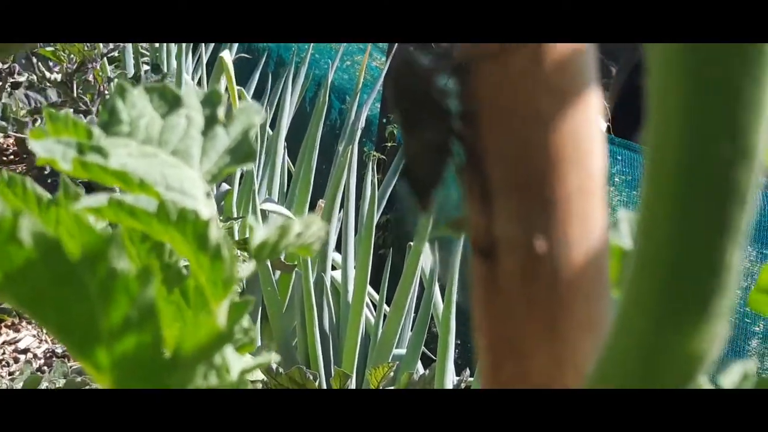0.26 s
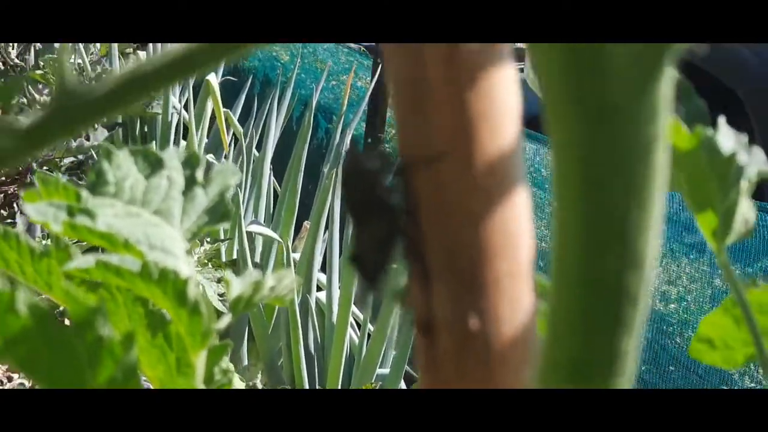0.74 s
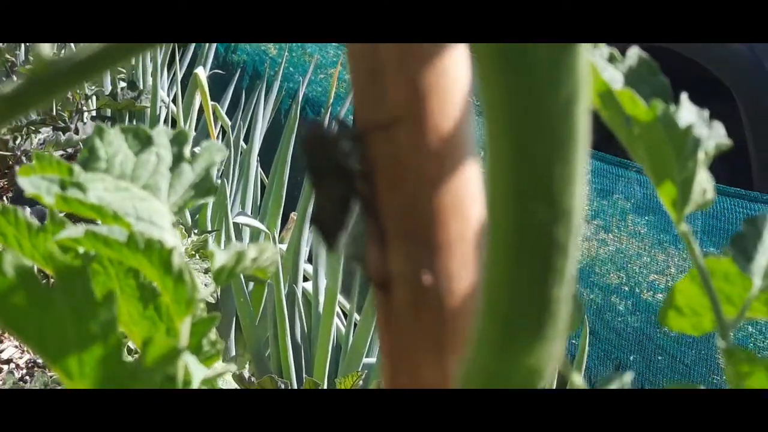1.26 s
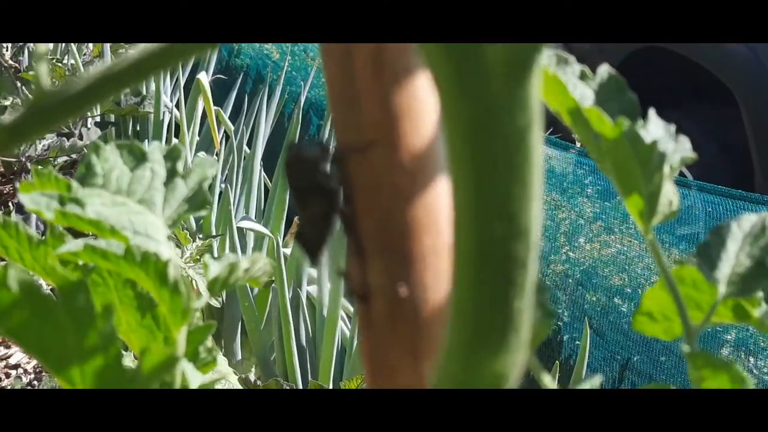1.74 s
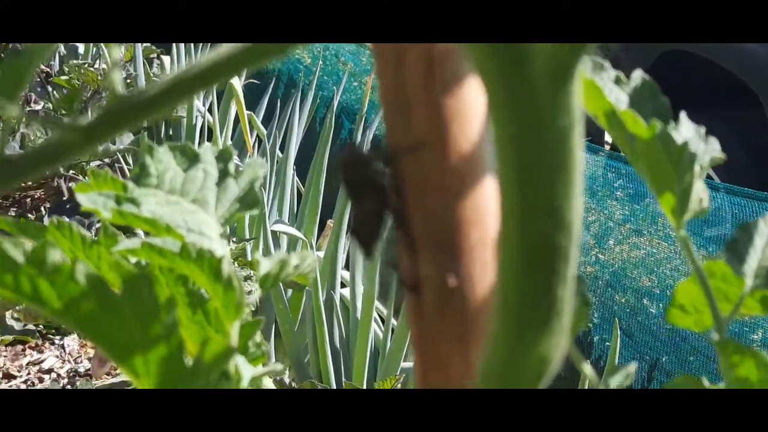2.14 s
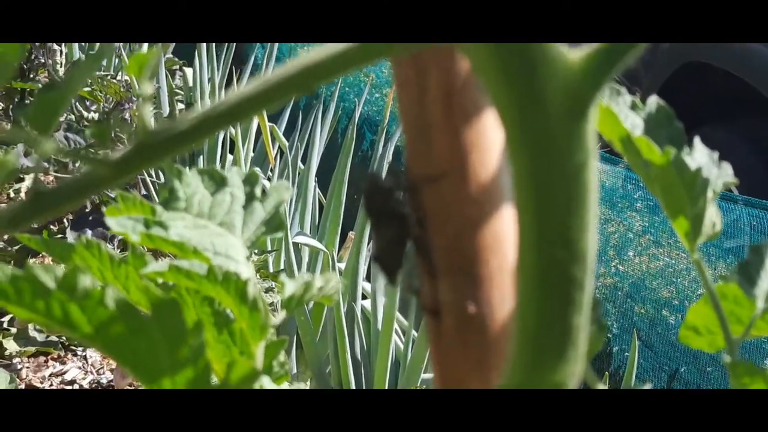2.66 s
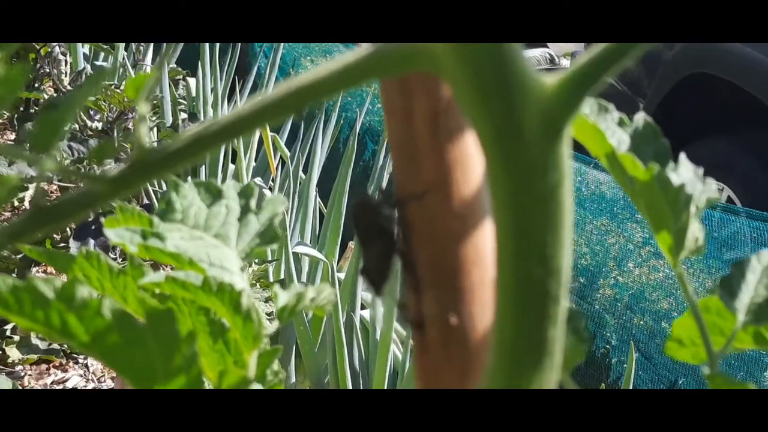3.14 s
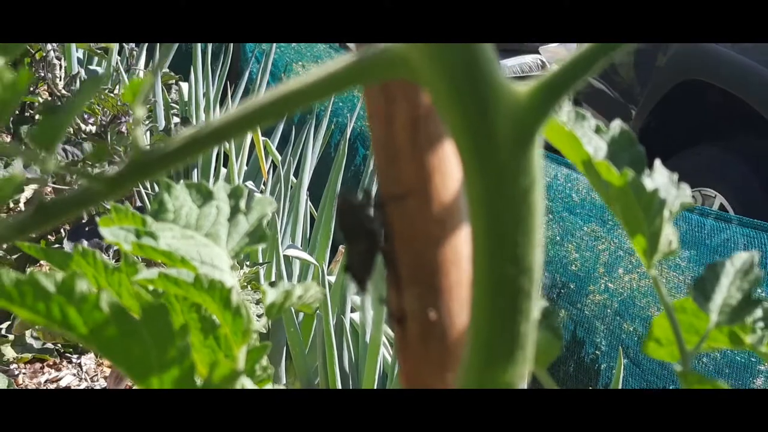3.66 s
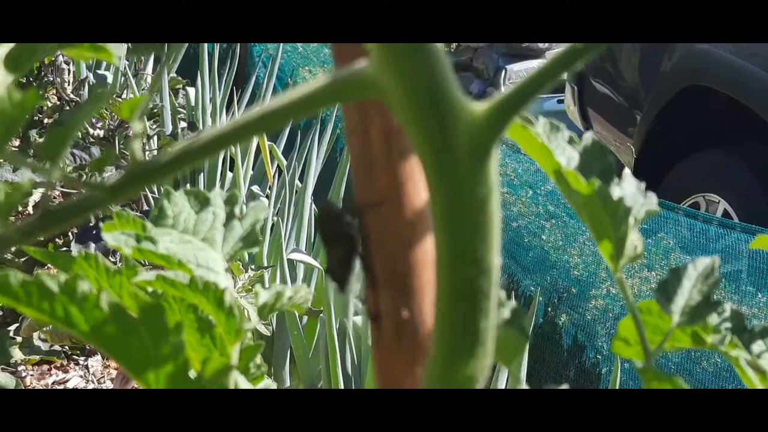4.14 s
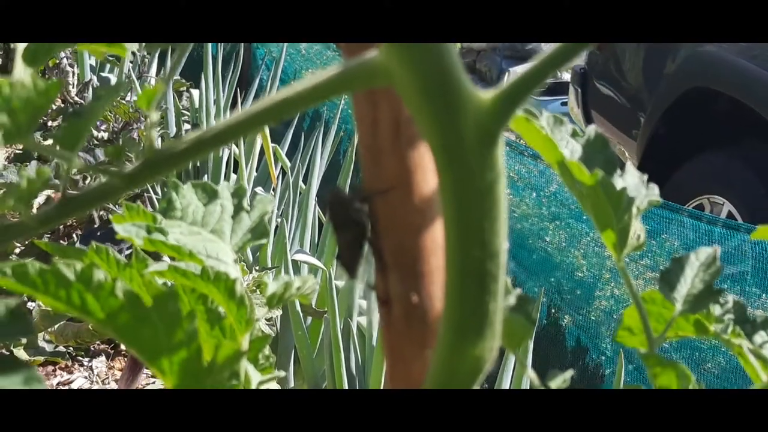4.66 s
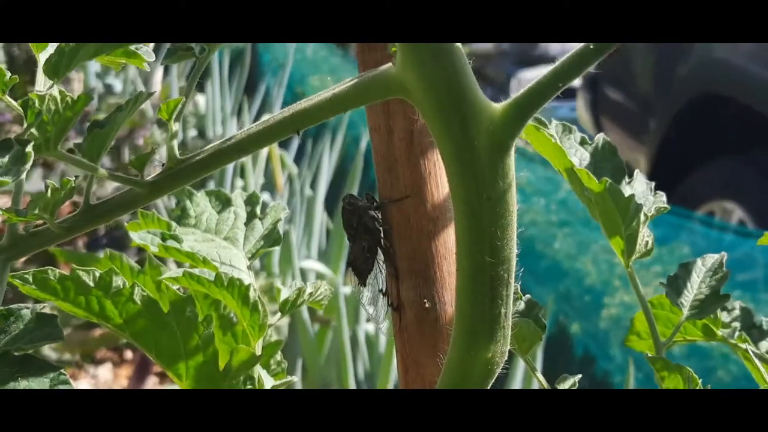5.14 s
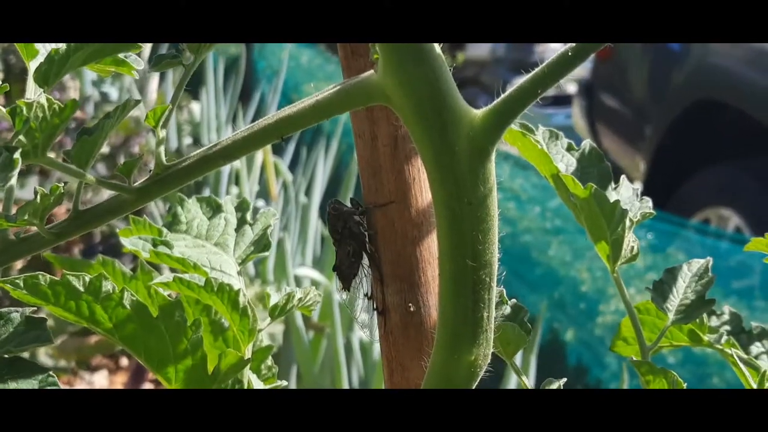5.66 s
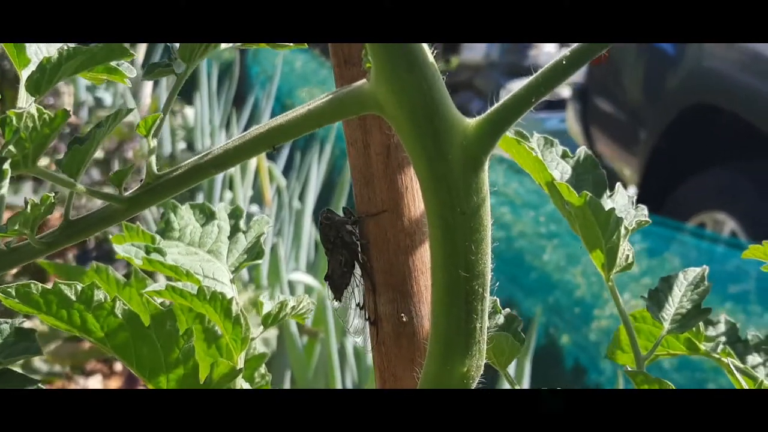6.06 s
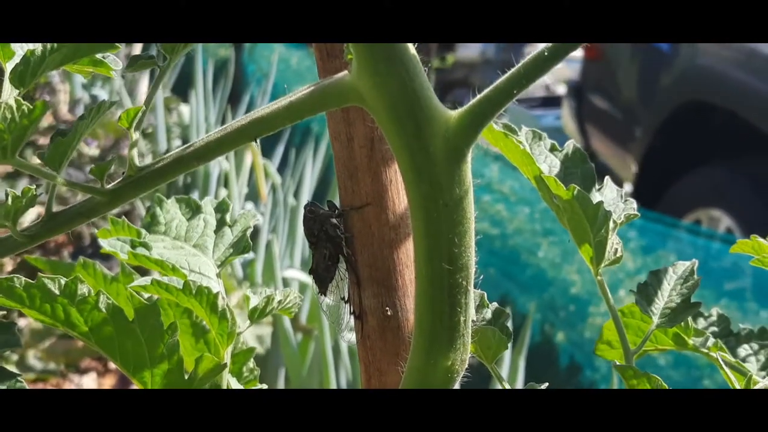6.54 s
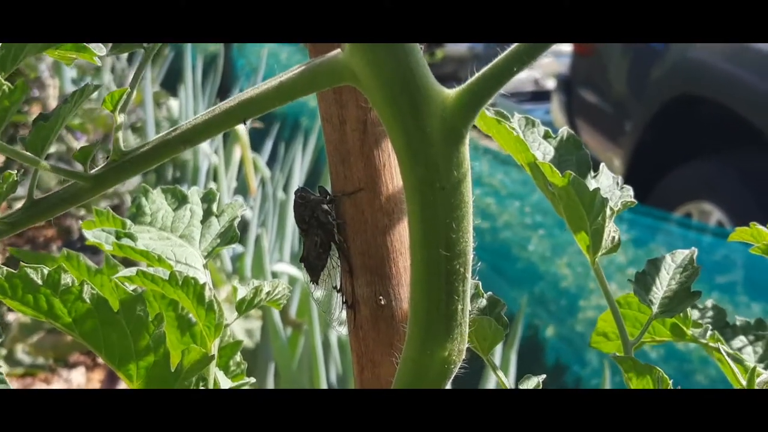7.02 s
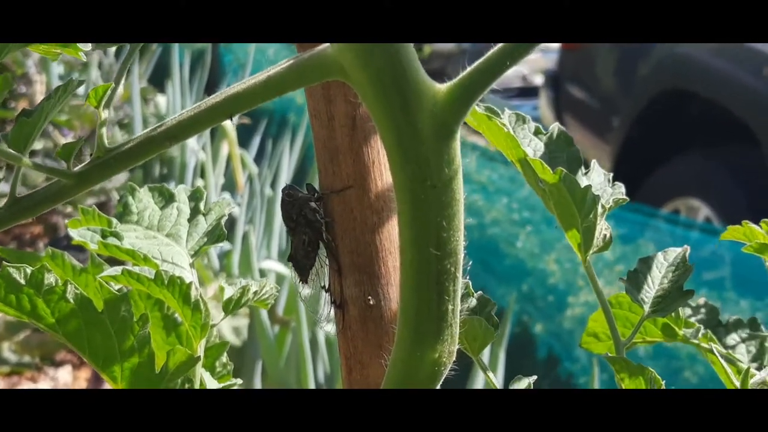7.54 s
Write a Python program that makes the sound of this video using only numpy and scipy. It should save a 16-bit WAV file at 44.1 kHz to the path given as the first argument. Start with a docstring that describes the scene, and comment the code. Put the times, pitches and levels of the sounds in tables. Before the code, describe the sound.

Close stereo pickup of a cicada among leafy plants. Its harsh high rasp pulses steadily for two seconds, becomes a finer rattle that quickens and slackens until about four and a half, pulses again for two seconds, then rattles in two fast surges to the end. Crisp clicks scatter briefly off stake and leaves, with soft low thumping underneath. The garden is nearly silent, with slight wind bumps late on the left.

```python
"""A cicada sings close by on a wooden stake in a vegetable garden: its tymbals buckle rib by rib and
ring the modes of the hollow abdomen. Two runs of three-stroke chirps alternate with two ticking
buzzes that speed up and slow down. Stake and leaves scatter the song; square-law overload of the
microphone adds a soft thud to every snap. Near the end low puffs of wind, made of coloured noise,
touch the left port; a faint hush of coloured noise lies under it all."""
import sys
import numpy as np
from scipy import signal
from scipy.fft import rfft, irfft
from scipy.io import wavfile

SR = 44100
rng = np.random.default_rng(int(sys.argv[2]) if len(sys.argv) > 2 else 0)


def file_out(sig):
    """Save sig as 16-bit WAV at sys.argv[1]."""
    # one column per channel
    cols = np.atleast_2d(sig).T
    # limit, then scale
    lim = np.clip(cols, -1, 1)
    pcm = np.round(lim * 32767).astype(np.int16)
    wavfile.write(sys.argv[1], SR, pcm)


N = 343539
TIME = np.arange(N) / SR   # s


def beats(pace):
    """Phase accumulation: the integral of the muscle rate gives one beat for every full turn."""
    s, per_s = np.transpose(pace)
    t = np.arange(s[0], s[-1], 1 / SR)
    turns = np.cumsum(np.interp(t, s, per_s)) / SR
    return np.interp(np.arange(int(turns[-1]) + 1), turns, t)


# Almost even beat of the two runs of chirps: [t/s, chirp rate f/Hz]
CHIRP_PACE = [
    [(0.012, 17.62), (0.4, 17.07), (0.9, 17.54), (1.2, 17.26), (1.3, 17.54), (2.03, 17.7)],
    [(4.5013, 18.49), (5.3, 17.43), (6.0, 17.52), (6.38, 17.68)],
]
# Strokes within one chirp, which darkens as it goes: [delay t/ms, relative level/dB, low-mode gain level/dB]
CHIRP_STROKES = [(0, 3.4, -1), (8.15, 3.0, 1), (15.9, 1.0, 4.5)]
# Pace of the two buzzes, with surges: [t/s, tymbal stroke rate f/Hz]
BUZZ_PACE = [
    [(2.0735, 16.17), (2.148, 36.8), (2.208, 32.13), (2.263, 39.27), (2.304, 59.73), (2.385, 39.16),
     (2.577, 44.18), (2.669, 85.34), (2.776, 105.25), (2.795, 88), (2.797, 15.6), (2.832, 37.2),
     (2.908, 40.25), (2.996, 49.27), (3.077, 51.16), (3.426, 51.78), (3.502, 56.02), (3.54, 45.24),
     (3.666, 50.35), (3.987, 49.09), (4.025, 57.83), (4.062, 51.68), (4.43, 45.8), (4.475, 54.89)],
    [(6.4204, 66.62), (6.459, 36.3), (6.571, 34.8), (6.673, 44.94), (6.716, 42.78), (6.758, 53.6),
     (6.832, 109.44), (6.923, 110.96), (7.024, 89.93), (7.049, 48.83), (7.101, 32.57), (7.205, 45.27),
     (7.277, 62.42), (7.358, 87.58), (7.488, 97.82), (7.591, 96.63), (7.768, 41.51)],
]


def strokes(unsteady_ms=0.0856, buzz_stroke_db=2):
    """Rhythmic excitation: time, level and darkness of every tymbal stroke, in chirps and buzzes."""
    chirps = np.concatenate([beats(pace) for pace in CHIRP_PACE])
    delay_ms, stroke_db, dark_db = np.transpose(CHIRP_STROKES)
    # the spread of the timing grows with the square root of the stroke's place in the chirp
    spread_ms = unsteady_ms * np.sqrt(np.arange(len(delay_ms)))
    slip_ms = spread_ms * rng.standard_normal((len(chirps), len(delay_ms)))
    in_chirps = chirps[:, None] + (delay_ms + slip_ms) / 1000
    in_buzz = np.concatenate([beats(pace) for pace in BUZZ_PACE])
    start = np.r_[in_chirps.ravel(), in_buzz]
    level_db = np.r_[np.tile(stroke_db, len(chirps)), np.full(len(in_buzz), buzz_stroke_db)]
    darkness_db = np.r_[np.tile(dark_db, len(chirps)), np.zeros(len(in_buzz))]
    return start, level_db, darkness_db


# The song as it reaches the moving microphone, levels relative:
# [t/s, stroke level/dB, low-mode level/dB, upper-mode level/dB, thud share level/dB]
SONG_COURSE = [(0.0, -21, -2, 3, 5.5), (0.55, -15.5, -1.5, -2, -2), (1.0, -17, -1.5, 0, -1.5),
               (2.02, -18, 0, -1, -4.5), (2.08, -18.5, 1, 1, -1), (2.12, -20.5, 4, 1, -5),
               (2.55, -22.5, 4, 3.5, -1.5), (2.76, -22, 5, 3.5, -2.5), (2.87, -22, 6, 2, -8),
               (3.1, -22, 6.5, 3, -7.5), (4.0, -19, 5.5, -1, -11.5), (4.45, -19, 5, -1.5, -10),
               (5.15, -17, 0, -1.5, -4), (5.8, -17.5, -0.5, -1, -3.5), (6.6, -17.5, 2, -1.5, -5),
               (6.9, -17.5, 0.5, -2.5, -4), (7.15, -19.5, 4.5, -1.5, -7.5), (7.55, -19.5, 4, -1.5, -6),
               (7.79, -19, 5.5, -3, -11.5)]


def song_at(s):
    """Slow modulation by source aim and path: each level of the song at the given times."""
    knots, *columns = np.transpose(SONG_COURSE)
    return [np.interp(s, knots, column) for column in columns]


# Ribs that buckle in one stroke, mostly lower as they go: [delay t/ms, relative level/dB, pitch ratio]
RIBS = [(0.2, 0, 1.036), (1.35, -0.5, 1.0), (3.1, -0.8, 0.99), (4.25, -0.3, 0.985), (5.0, -8, 0.97),
        (6.3, -4, 0.95)]


def snaps(wander_ms=0.06, jitter_ms=0.025, uneven_db=1.0, count=24):
    """Sequential buckling: each rib snaps once a stroke, its place in the stroke slowly wandering."""
    start, stroke_db, dark_db = strokes()
    wander_knots = np.linspace(0, N / SR, count)
    ribs = []
    for delay_ms, rib_db, pitch in RIBS:
        wander = np.interp(start, wander_knots, rng.standard_normal(count))
        late, strong = rng.standard_normal((len(start), 2)).T
        s = start + (delay_ms + wander_ms * wander + jitter_ms * late) / 1000
        snap_db = song_at(s)[0] + stroke_db + rib_db + uneven_db * strong
        ribs.append((s, snap_db, pitch, dark_db))
    return ribs


# Modes of tymbal and abdomen, before the rib's pitch ratio: [f/Hz, bandwidth f/Hz, relative level/dB]
BODY_MODES = [(5324, 607, -6), (6230, 185, -3.5), (7040, 362, -2), (8223, 692, -1.5), (10820, 1390, -4.5),
              (13600, 2800, -5.5)]


def abdomen(ribs, lowest_hz=4900, cavity_hz=7600, cavity_width_hz=3400, mode_spread_db=1.7):
    """Modal superposition: every snap rings each body mode with a strength of its own."""
    out = np.zeros(N)
    for s, snap_db, pitch, dark_db in ribs:
        _, low_db, upper_db, _ = song_at(s)
        low_db = low_db + dark_db
        # the two lowest modes and the fourth trade places with the aim
        aims_db = [low_db, low_db, 0, -low_db / 2, upper_db, upper_db]
        for k, ((hz, width_hz, mode_db), aim_db) in enumerate(zip(BODY_MODES, aims_db)):
            random_db = mode_spread_db * rng.standard_normal(len(s))
            size = from_db(snap_db + mode_db + aim_db + random_db)
            # neighbouring modes have opposite polarity
            out += (-1) ** k * resonate(clicks(s, size), hz * pitch, width_hz)
    # the air cavity rounds each snap
    rounded = resonate(out, cavity_hz, cavity_width_hz)
    # so small a body radiates almost nothing below its first resonance
    return cut(rounded, lowest_hz, "high", order=6)


# Scatter from the stake, the leaves and the yard: [level/dB, decay by 60 dB t/s]
SCATTER = [(-8, 0.011), (-7.5, 0.032), (-14.5, 0.105)]


def foliage(x, count=16, size=5, direct_hz=11500):
    """Multipath propagation: direct sound plus scatter, crossfading between paths as the microphone drifts."""
    t, hop = TIME[:SR // 4], N // count + 1
    out = np.zeros((2, N + len(t)))
    for centre in range(0, N + hop, hop):
        response = np.zeros((2, len(t)))
        for scatter_db, t60 in SCATTER:
            decay = from_db(-60 * t / t60) * (t > .0012)   # scatter starts after 1.2 ms
            paths = rng.standard_normal(response.shape) * decay
            response += from_db(scatter_db) * paths / np.linalg.norm(paths, axis=1, keepdims=True)
        # the direct sound reaches the right port size samples after the left
        direct = np.eye(size + 1, len(t))[[0, size]]
        # its treble beams past and arrives scattered
        response += cut(direct, direct_hz, "low", order=3)
        near = np.arange(max(centre - hop, 0), min(centre + hop, N))
        fade = 1 - abs(near - centre) / hop
        part = signal.fftconvolve(x[:, near] * fade, response, axes=1)
        out[:, near[0]:near[0] + part.shape[1]] += part
    return out[:, :N]


# Where the cicada sits between the two sides: [t/s, left minus right level/dB]
PAN = [(0.0, -1.5), (1.08, 0), (3.25, 0.5), (3.64, -0.2), (5.16, 0.5), (6.29, 0.1), (6.62, 2.5),
       (7.79, 1.5)]


def cicada(ribs, level_db=30, stake_db=-9, count=46):
    """Directivity and reflection: modes radiate unevenly to the sides; the right adds a stake echo."""
    left, right = abdomen(ribs), abdomen(ribs)
    echo = np.r_[np.zeros(count), right[:-count]]   # count samples later
    right = (right + from_db(stake_db) * echo) / np.hypot(1, from_db(stake_db))
    pan_db = np.interp(TIME, *np.transpose(PAN))
    side_db = np.array([pan_db, -pan_db]) / 2
    return foliage(np.array([left, right])) * from_db(level_db + side_db)


# Colour of the thud on the left port: [f/Hz, relative level/dB]
THUD_LEFT = [(8, -59), (18, -48), (35, -11.5), (52, -3), (80, -1), (120, -3), (190, -5), (320, 1),
             (420, -6), (520, -1.5), (640, -16), (850, -3.5), (1000, -8.5), (1200, 0), (1500, -13),
             (2400, -11.5), (3000, -11), (4000, -20.5), (9000, -69)]
# Colour of the thud on the right port: [f/Hz, relative level/dB]
THUD_RIGHT = [(10, -53), (30, -52), (70, -7.5), (150, -7), (320, 3), (600, -2.5), (1300, 4), (2500, 0.5),
              (4000, -5.5), (9000, -94)]
# Gain of the left thud's deepest part: [t/s, level/dB]
THUD_BASS = [(0.18, 3), (0.28, 5.5), (0.95, 7), (1.03, 0.5), (1.44, 10), (1.54, 1), (2.02, 7), (2.08, 9),
             (2.14, 2.5), (3.0, 1), (4.3, 3.5), (4.6, 0), (5.2, 5), (5.75, -3), (6.5, 1.5)]


def thud(song, ribs, left_db=-10, right_db=-14, steady_share=0.42, bass_hz=130, snap_hz=700):
    """Square-law distortion: the overloaded microphone turns each snap's energy into a low thud."""
    impulses = sum(clicks(s, from_db(2 * snap_db)) for s, snap_db, _, _ in ribs)
    energy = cut(impulses, snap_hz, "low", order=1)
    # one share repeats alike from snap to snap, the rest is roughened where rings overlap
    steady = energy * np.mean(song ** 2) / energy.mean()
    power = steady_share * steady + (1 - steady_share) * song ** 2
    share_db = song_at(TIME)[3]
    left, right = colour(-power[0], THUD_LEFT), colour(-power[1], THUD_RIGHT)
    bass_gain = from_db(np.interp(TIME, *np.transpose(THUD_BASS)))
    left = left + (bass_gain - 1) * cut(left, bass_hz, "low", order=1)
    return np.array([from_db(left_db + share_db) * left, from_db(right_db + share_db) * right])


# Puffs of wind, bell-shaped in time: [centre t/s, half-length to 1/e t/s, peak level/dB]
PUFFS = [(6.61, 0.014, -43), (6.83, 0.02, -55), (7.293, 0.05, -42.5), (7.335, 0.02, -39),
         (7.604, 0.013, -36), (7.785, 0.0081, -36)]
# Colour of the wind: [f/Hz, relative level/dB]
WIND_COLOUR = [(20, -60), (50, -12.5), (80, 2), (140, -5.5), (250, -39), (1000, -66)]


def wind():
    """Turbulent pressure as low-pitched noise: short puffs, on the left port only."""
    gust = sum(from_db(db) * np.exp(-((TIME - s) / half) ** 2) for s, half, db in PUFFS)
    return np.array([gust * colour(rng.standard_normal(N), WIND_COLOUR), np.zeros(N)])


# Colour of the quiet garden: [f/Hz, relative level/dB]
GARDEN_COLOUR = [(25, -10), (60, 2), (120, -9.5), (300, 7.5), (1000, 1.5), (2000, 0), (3500, -5),
                 (8000, -0.5), (15000, -38)]


def garden(level_db=-57, right_db=-2):
    """Diffuse background: a faint, dull outdoor hush of independent coloured noise on each side."""
    hush = np.array([colour(white, GARDEN_COLOUR) for white in rng.standard_normal((2, N))])
    return from_db(level_db + np.array([[0], [right_db]])) * hush


def from_db(db):
    """Logarithmic level: decibels to amplitude gain."""
    return 10 ** (np.asarray(db) / 20)


def cut(x, hz, kind, order):
    """Maximally flat filtering: Butterworth high- or low-pass."""
    sos = signal.butter(order, min(hz, SR / 2 - 1), kind, fs=SR, output="sos")
    return signal.sosfilt(sos, x)


def clicks(s, size):
    """Band-limited impulses: windowed sincs place clicks between the samples where need be."""
    taps = np.floor(s * SR).astype(int)[:, None] + np.arange(-3, 5)
    away = taps - s[:, None] * SR
    weights = size[:, None] * np.sinc(away) * np.sinc(away / 4)
    # clicks past the end fall into one spare sample, which is dropped
    return np.bincount(np.clip(taps, 0, N).ravel(), weights.ravel(), N + 1)[:N]


def resonate(x, hz, width_hz):
    """Damped oscillator: a two-pole resonance with gain 1 on top."""
    r = np.exp(-np.pi * width_hz / SR)
    zeros = np.array([1, 0, -1]) * (1 - r * r) / 2
    poles = [1, -2 * r * np.cos(2 * np.pi * hz / SR), r * r]
    inaudible = 1e-18 * (np.arange(N) % 3)   # keeps the decay out of slow denormal numbers
    return signal.lfilter(zeros, poles, x + inaudible)


def colour(x, spectrum, size=8192):
    """Minimum-phase filtering: the folded cepstrum gives a causal response of unit energy."""
    hz, db = np.transpose(spectrum)
    grid = np.maximum(np.fft.rfftfreq(size, 1 / SR), 1)
    gain = from_db(np.interp(np.log(grid), np.log(hz), db))
    cepstrum = irfft(np.log(gain))
    cepstrum[1:size // 2] *= 2
    cepstrum[size // 2 + 1:] = 0
    response = irfft(np.exp(rfft(cepstrum)))
    return signal.fftconvolve(x, response / np.linalg.norm(response))[:N]


def scene():
    """Superposition: the cicada and its thuds over wind and garden."""
    ribs = snaps()
    song = cicada(ribs)
    return song + thud(song, ribs) + wind() + garden()


def record(dry, cutoff_hz=16600):
    """Band limitation: a steep low-pass, 60 dB down from the cutoff upwards."""
    return signal.sosfilt(signal.cheby2(14, 60, cutoff_hz, fs=SR, output="sos"), dry)


dry = scene()
out = record(dry)
file_out(out)
```